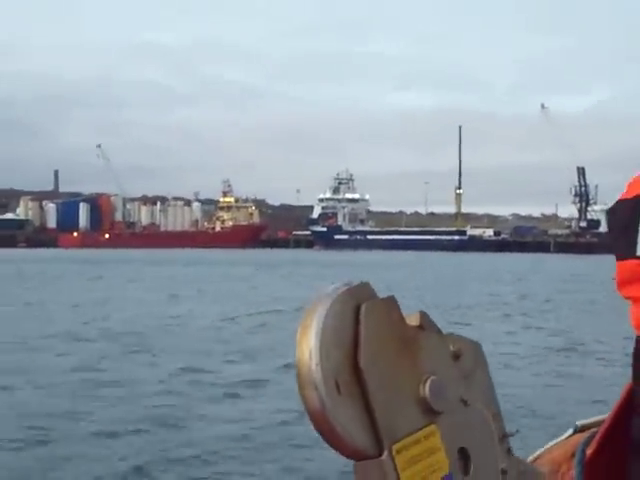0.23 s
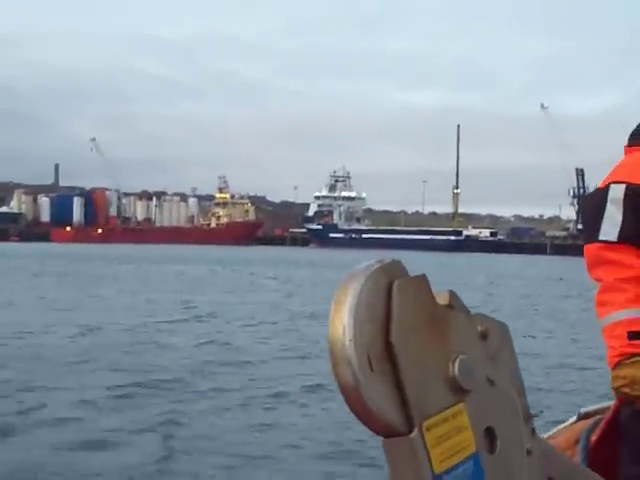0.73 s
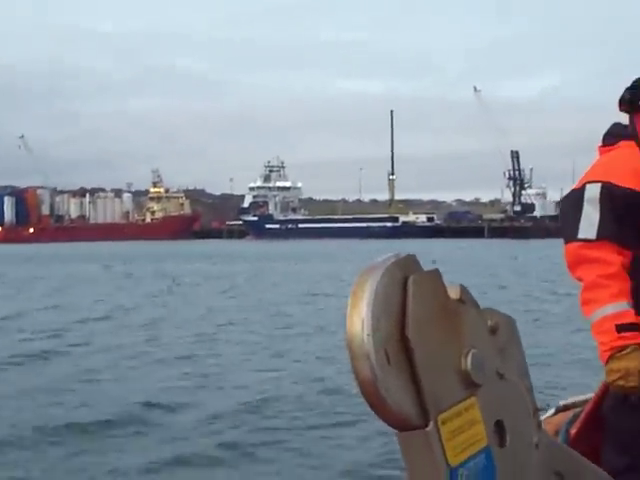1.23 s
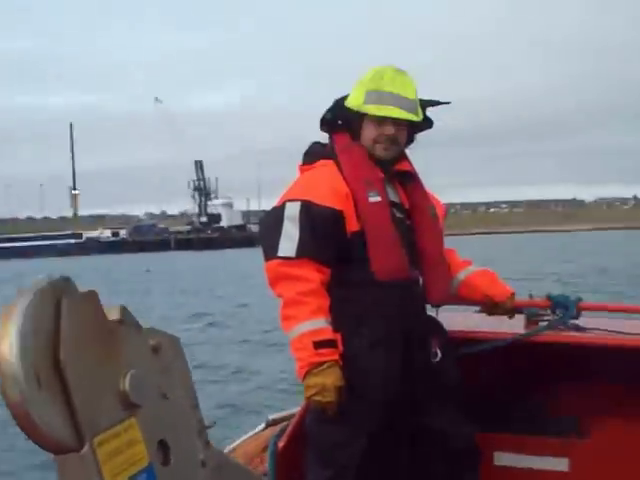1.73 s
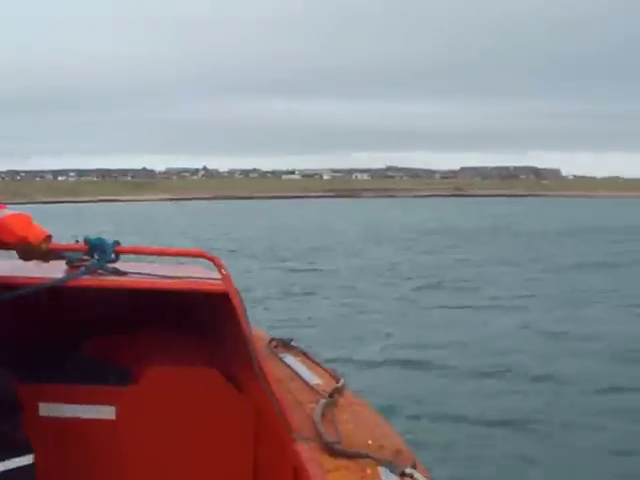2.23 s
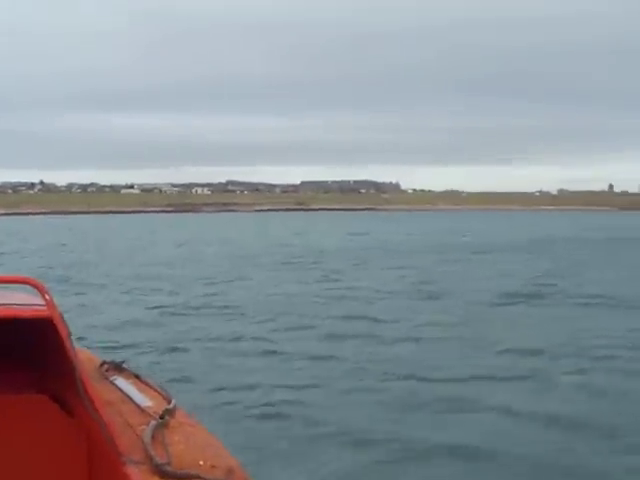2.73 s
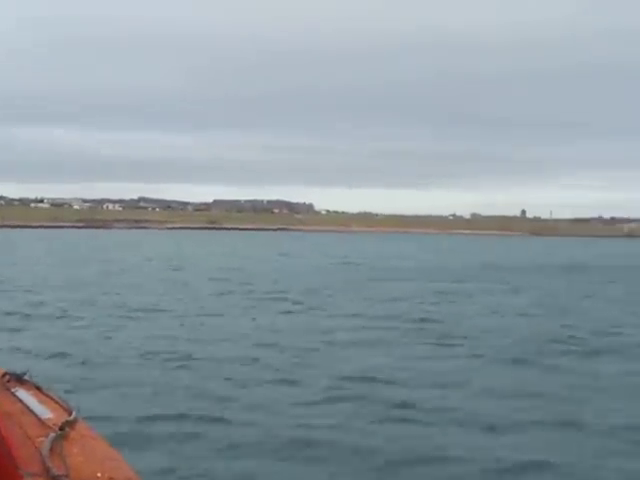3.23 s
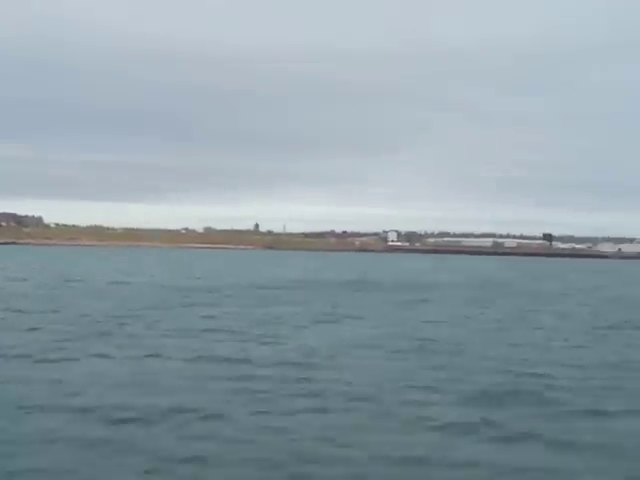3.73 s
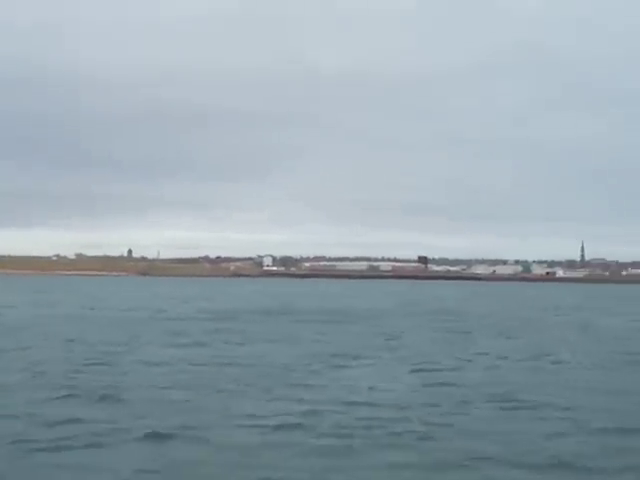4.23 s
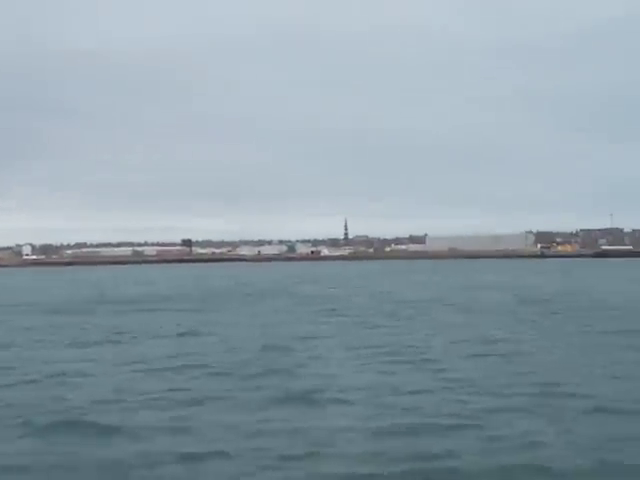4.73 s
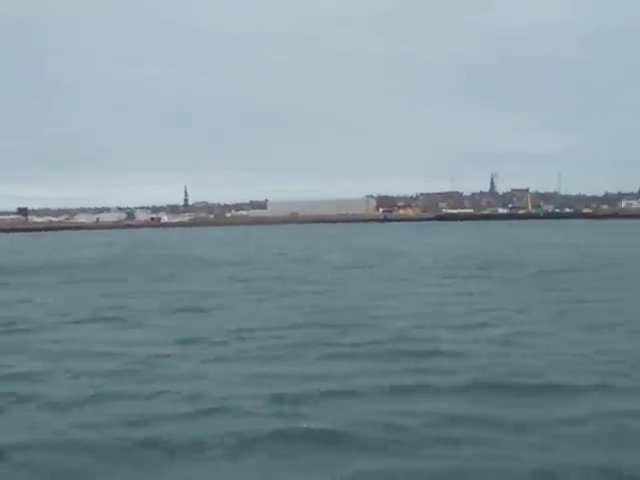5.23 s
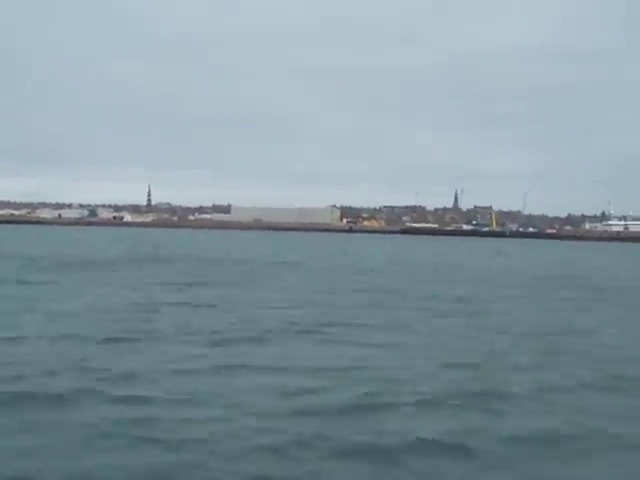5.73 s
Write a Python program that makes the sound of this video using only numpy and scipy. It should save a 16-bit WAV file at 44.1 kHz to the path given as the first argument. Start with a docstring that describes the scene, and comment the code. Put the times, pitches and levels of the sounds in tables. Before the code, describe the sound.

A fast boat crosses a harbour, its engine droning steadily under a hiss of water. Wind hits the hand-held microphone from the start, distorting into rapid pops and tiny silences. Just before one second the treble dulls and the wind briefly eases, then the dense, sputtering buffeting returns and carries on. Near the end, three faint spray drops tick on the camera.

```python
"""A fast rescue boat crosses a harbour: its engine drones, its water jet hisses astern.
From the start, wind on a hand-held camera's microphone jams the preamplifier at its rails,
chopping the rush into pops and short silences. Near 0.8 s the treble dulls and the wind eases;
from 1.3 s the chopping is dense again. At 4.7-5.5 s three spray drops tick on the camera."""
import sys
import numpy as np
from scipy.fft import rfft, irfft, next_fast_len
from scipy.io import wavfile
from scipy.ndimage import map_coordinates

SR = 44100
rng = np.random.default_rng(int(sys.argv[2]) if len(sys.argv) > 2 else 0)


def file_out(sig):
    """Save sig as 16-bit WAV at sys.argv[1]."""
    # one column per channel
    cols = np.atleast_2d(sig).T
    # limit, then scale
    lim = np.clip(cols, -1, 1)
    pcm = np.round(lim * 32767).astype(np.int16)
    wavfile.write(sys.argv[1], SR, pcm)


N = 263277
T = np.arange(N) / SR
HZ = np.fft.rfftfreq(next_fast_len(N + SR // 2), 1 / SR)

# long gusts, each a dropout and a slap: (start [s], length [s], relative wake level [dB])
GUSTS = [(0.441, 0.025, 0), (1.266, 0.023, 2), (1.485, 0.018, -7), (1.542, 0.019, -8), (1.657, 0.015, -1),
         (1.781, 0.021, 5), (2.026, 0.016, -1), (2.049, 0.029, 1), (2.085, 0.019, 4), (2.133, 0.017, 1),
         (2.355, 0.016, -2), (2.404, 0.018, 1), (2.433, 0.02, -8), (2.453, 0.015, -7), (2.469, 0.017, 5),
         (2.496, 0.025, 1), (2.623, 0.024, 2), (2.652, 0.037, 2), (2.708, 0.015, -6), (2.743, 0.03, -7),
         (2.776, 0.032, -8), (2.872, 0.016, -2), (2.897, 0.032, 4), (2.97, 0.034, -2), (3.011, 0.017, 5),
         (3.038, 0.015, 1), (3.058, 0.04, -1), (3.176, 0.031, 4), (3.247, 0.033, 2), (3.294, 0.027, 0),
         (3.335, 0.033, -1), (3.475, 0.034, -2), (3.514, 0.024, 1), (3.55, 0.029, 2), (3.64, 0.04, 2),
         (3.687, 0.028, -2), (3.762, 0.016, -8), (3.779, 0.018, -8), (3.799, 0.057, 3), (3.864, 0.03, -1),
         (3.903, 0.016, -2), (3.921, 0.044, -1), (4.017, 0.023, 2), (4.061, 0.027, -1), (4.091, 0.022, -7),
         (4.129, 0.038, 5), (4.173, 0.026, -6), (4.266, 0.021, 5), (4.429, 0.021, -6), (4.518, 0.029, -8),
         (4.6, 0.026, -2), (4.628, 0.033, 5), (4.725, 0.017, 3), (4.889, 0.039, -8), (4.943, 0.021, 8),
         (5.038, 0.017, 3), (5.128, 0.021, -4), (5.178, 0.032, -7), (5.288, 0.016, 0), (5.332, 0.028, 7),
         (5.388, 0.022, 7), (5.504, 0.016, 3), (5.577, 0.027, -5), (5.605, 0.032, -1), (5.792, 0.016, 0),
         (5.833, 0.018, 1), (5.92, 0.016, -8)]


def amp(db):
    """Decibels to gain."""
    return 10 ** (np.asarray(db) / 20)


def unit(x):
    """x at rms 1."""
    return x / np.sqrt(np.mean(x ** 2) + 1e-20)


def curve(points):
    """Per-sample values from (time [s], value) points."""
    return np.interp(T, *np.transpose(points))


def shape(points):
    """Gain per bin from (frequency [Hz], level [dB]) points, log axis."""
    hz, db = np.transpose(points)
    return amp(np.interp(np.log(HZ + 1), np.log(hz + 1), db))


def filtered(x, response):
    """x through a frequency response."""
    return irfft(rfft(x, 2 * len(HZ) - 2) * response)[:N]


def poles(centre_hz, q):
    """Two-pole low-pass response."""
    return 1 / (1 - (HZ / centre_hz) ** 2 + 1j * HZ / (centre_hz * q))


def noise(spectrum):
    """Coloured noise, rms 1."""
    return unit(filtered(rng.standard_normal(N), shape(spectrum)))


def wobble(rate_hz):
    """Smooth random curve, knots at rate_hz."""
    return map_coordinates(rng.standard_normal(N // 8), [T * rate_hz + 2])


def engine(hull_db, throb, drift):
    """Engine orders over hull roar that throbs with each firing."""
    # four-stroke cycle rate: (time [s], rate [Hz])
    cycle_rate = [(0, 27.94), (2.3, 28.43), (3.2, 27.73), (6, 28.34)]
    # engine tones: (multiple of cycle rate, level [dB])
    orders = [(6, -20), (9, -24), (12, -24), (16, -27), (18, -27), (20, -32), (26, -34), (30, -32),
              (40, -36), (48, -39), (57, -38), (69, -42)]
    # hull roar: (frequency [Hz], relative level [dB])
    hull_spectrum = [(25, 8.5), (60, 12), (120, 8.5), (200, -7.5), (300, 7), (500, -4.5), (800, -9),
                     (1300, -22.5), (2000, -18.5), (3000, -24.5), (5000, -47), (9000, -26.5)]
    cycles = np.cumsum(curve(cycle_rate) * (1 + drift * wobble(4.096))) / SR
    tones = sum(amp(db + 2 * wobble(4)) * np.sin(2 * np.pi * (order * cycles + rng.random()))
                for order, db in orders)
    firing = np.cos(2 * np.pi * 6 * cycles)  # six per cycle
    return np.sqrt(2) * tones + amp(hull_db) * noise(hull_spectrum) * (1 + throb * firing)


def water(hiss_db, flutter_db, swell_db):
    """Jet and bow wave hiss, fluttering as the water breaks up."""
    # hiss: (frequency [Hz], relative level [dB])
    hiss_spectrum = [(1000, -9), (3000, -21.5), (5000, 1), (6800, 7), (8000, 4.5), (12000, -20.5)]
    return amp(hiss_db + flutter_db * wobble(70) + swell_db * wobble(4.4)) * noise(hiss_spectrum)


def surges(blast_s, wake_s):
    """Wind level offset [dB]: a Gaussian bump or dip per blast and gust wake."""
    # blasts of turbulence: (time [s], relative level [dB])
    blasts = [(.152, 7), (0.244, 5), (0.351, 2), (.405, 3), (0.526, 4), (0.646, 4.5), (.91, 6),
              (1.192, 8.5), (1.351, 12), (1.467, 8.5), (1.636, 6.5), (1.737, 7), (2.122, 4), (2.868, 6),
              (3.291, 2), (3.401, 2), (3.753, 11), (4.01, 4.5), (4.346, 0.5), (4.51, 4), (4.747, 5),
              (4.825, 6.5), (5.02, 5.5), (5.247, 2.5), (5.37, 3), (5.455, 11.5)]
    starts, lengths, wake_db = np.transpose(GUSTS)
    latest = np.maximum(np.searchsorted(starts + lengths / 2, T) - 1, 0)
    wakes = wake_db[latest] * np.exp(-((T - (starts + lengths)[latest]) / wake_s) ** 2)
    return wakes + sum(db * np.exp(-((T - s) / blast_s) ** 2) for s, db in blasts)


def wind_strength(surge_db, contrast, flutter_db):
    """Wind gain: swells, surges and flutter; contrast scales their dB sum."""
    # wind at the microphone: (time [s], relative level [dB])
    swells = [(0, -13.5), (.2, -11), (.66, -13), (.83, -22), (1.12, -23.5), (1.25, -21.5), (1.52, -24.5),
              (1.7, -15.5), (1.88, -15), (2.0, -21), (2.3, -23), (2.85, -22.5), (3.1, -27.5), (3.3, -23),
              (3.6, -27.5), (4.0, -18.5), (4.3, -14), (4.5, -13), (4.69, -20.5), (5.0, -14), (5.17, -19.5),
              (5.45, -15), (5.7, -24), (5.9, -16)]
    return amp(contrast * (curve(swells) + surge_db + flutter_db * wobble(110) + 18))


def vortices(strength, shed_hz, scatter, swing):
    """Vortices peel off the camera unevenly; in strong wind they swing from rail to rail."""
    turns = np.cumsum(shed_hz * np.exp(scatter * wobble(300))) / SR
    peak = swing * strength ** 2 * amp(4 * wobble(140))
    return np.minimum(peak, 3.4) * np.sin(2 * np.pi * turns)


def wind(strength, roar_db, spray_db, roar_lump_db, spray_lump_db):
    """Fine turbulence roars and spray fizzes, both in quick lumps."""
    # turbulence: (frequency [Hz], relative level [dB])
    roar_spectrum = [(40, 5.5), (200, -6.5), (450, 3), (900, -4.5), (1600, -14.5), (2500, -26.5),
                     (4000, -60.5), (8000, -48.5)]
    # fine spray: (frequency [Hz], relative level [dB])
    spray_spectrum = [(500, -23.5), (1500, 8), (2500, 0), (4000, -13), (7000, -5.5), (12000, -19)]
    # spray carried by the wind: (time [s], relative level [dB])
    wetness = [(0, -10), (.7, 0.5), (1.8, -3.5), (3.5, 6.5), (4.3, 0.5), (5.1, 10), (6, -3.5)]
    roar = unit(noise(roar_spectrum) * amp(roar_lump_db * wobble(200)))
    fizz = unit(noise(spray_spectrum) * amp(spray_lump_db * wobble(300)))
    return strength * (amp(roar_db) * roar + amp(spray_db + curve(wetness)) * fizz)


def jams(surge_db, eddy_s, log_spread, jitter, min_gap_s, thinning):
    """Rows (start [s], length [s]): long gusts, and short eddies scattered over the lulls."""
    # eddies before surges thin them: (time [s], rate [1/s])
    eddy_rate = [(0, 46), (.72, 46), (.8, 1), (1.22, 0.91), (1.3, 41.8), (1.52, 70), (2.15, 52.2),
                 (2.26, 3), (2.42, 59.8), (3.0, 50.9), (3.13, 2.9), (3.23, 58), (3.58, 21.8), (3.75, 46.5),
                 (4.2, 62), (4.55, 70), (4.68, 39.4), (4.9, 58), (5.55, 50.2), (5.7, 0.79), (5.88, 60)]
    passed = np.cumsum(np.maximum(curve(eddy_rate), 1) * amp(-thinning * surge_db)) / SR
    rows = [(s, length) for s, length, _ in GUSTS]
    lulls = zip([0] + [s + length for s, length in rows], [s for s, _ in rows] + [T[-1]])
    for (begin, end), draws in zip(lulls, rng.standard_normal((len(GUSTS) + 1, 2, 100))):
        first, last = np.interp([begin, end], T, passed)
        count = max(round(last - first), 0)
        late, size = draws[:, :count]
        places = (np.arange(count) + .5 + jitter * late) / max(count, 1)
        middles = np.interp(first + (last - first) * np.sort(places), passed, T)
        for middle, length in zip(middles, eddy_s * np.exp(log_spread * size)):
            start = max(middle - length / 2, begin + min_gap_s)
            stop = min(middle + length / 2, end - min_gap_s)
            if stop > start:
                rows.append((start, stop - start))
                begin = stop
    return sorted(rows)


def gusts(rows, strength, rise_s, steepen, reversal_chance):
    """Slow pressure: each gust or eddy stays past the rail for its length."""
    pressure, side = np.zeros(N), 1
    for (s, length), draw in zip(rows, rng.random(len(rows))):
        side = -side if draw < reversal_chance else side  # push or suction
        near = slice(max(int((s - .01) * SR), 0), int((s + length + .01) * SR))
        inside_s = np.minimum(T[near] - s, s + length - T[near])
        front = inside_s / rise_s * strength[near] ** steepen  # steeper in strong wind
        pressure[near] += side * np.exp(np.minimum(front, np.pi))
    return pressure


def drops(level_db, ring_hz, t60_s):
    """Each spray drop briefly rings the camera's shell."""
    # drop impacts: (time [s], relative level [dB])
    impacts = [(4.7238, -4), (4.784, -9), (5.472, -5.5)]
    out, t = np.zeros(N + SR), np.arange(SR // 50) / SR
    for s, db in impacts:
        tick = np.sin(2 * np.pi * ring_hz * t) + .5 * rng.standard_normal(len(t))
        out[round(s * SR):][:len(t)] += amp(db + level_db - 60 * t / t60_s) * tick
    return out[:N]


def scene():
    """Pressure at the microphone; 1 = preamplifier rail."""
    boat = engine(hull_db=-11.5, throb=0.69, drift=0.00101)
    boat += water(hiss_db=-34.5, flutter_db=1.7, swell_db=-0.9)
    surge_db = surges(blast_s=.013, wake_s=.013)
    strength = wind_strength(surge_db, contrast=1.086, flutter_db=1.93)
    air = vortices(strength, shed_hz=179.8, scatter=.52, swing=0.89)
    air += wind(strength, roar_db=-11.5, spray_db=-24.5, roar_lump_db=5.0, spray_lump_db=7.5)
    ticks = drops(level_db=7, ring_hz=6800, t60_s=0.0025)
    rows = jams(surge_db, eddy_s=0.00828, log_spread=.25, jitter=.22, min_gap_s=.002, thinning=.9)
    air += gusts(rows, strength, rise_s=0.00052, steepen=0.35, reversal_chance=.92)
    return (boat + air + ticks)[None]


def preamplifier(x, cut_hz, cut_q):
    """Clips at the rails; the low-cut turns each jam into a pop and silence."""
    # camera treble roll-off: (frequency [Hz], gain [dB])
    roll_off = [(20, 3), (7000, -2), (7700, -4), (8400, -12.5), (8900, -35), (9600, -59), (11000, -88)]
    low_cut = -(HZ / cut_hz) ** 2 * poles(cut_hz, cut_q)
    return filtered(np.clip(x, -1, 1), low_cut * shape(roll_off))


def treble_notch(x, from_s, centre_hz, q, gain_db):
    """A treble notch sets in and stays."""
    band = 1j * HZ / (centre_hz * q) * poles(centre_hz, q)
    return np.where(T < from_s, x, filtered(x, 1 - (1 - amp(gain_db)) * band))


def record(dry):
    """Overloaded camera: jam, notch, soft clip, dull band-limited top."""
    ceiling, top_hz = .71, 16800
    x = preamplifier(dry[0], cut_hz=519, cut_q=0.62)
    x = .9 * treble_notch(x, from_s=0.76, centre_hz=4203, q=2.3, gain_db=-14.0)
    x = x / (1 + (x / ceiling) ** 12) ** (1 / 12)
    return filtered(x, poles(centre_hz=7500, q=.75) * (HZ < top_hz))[None]


dry = scene()
out = record(dry)
file_out(out)
```